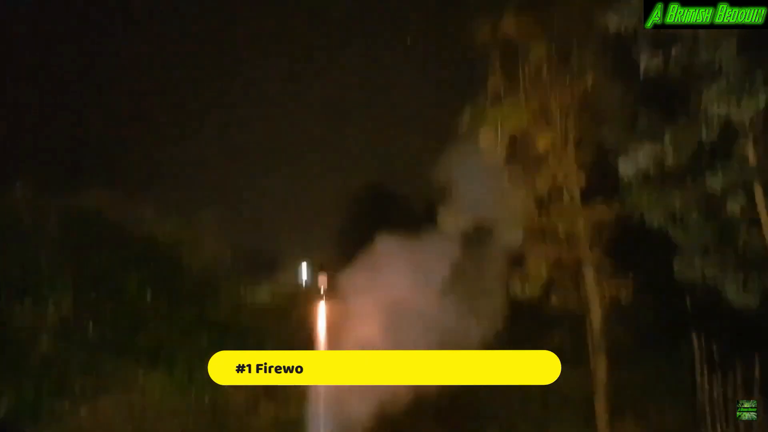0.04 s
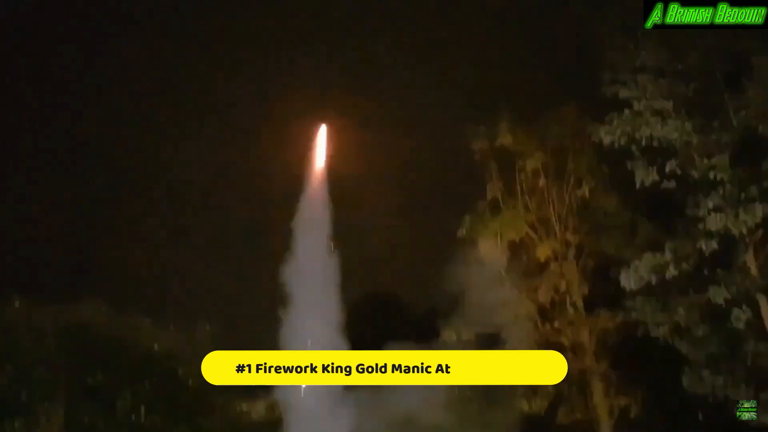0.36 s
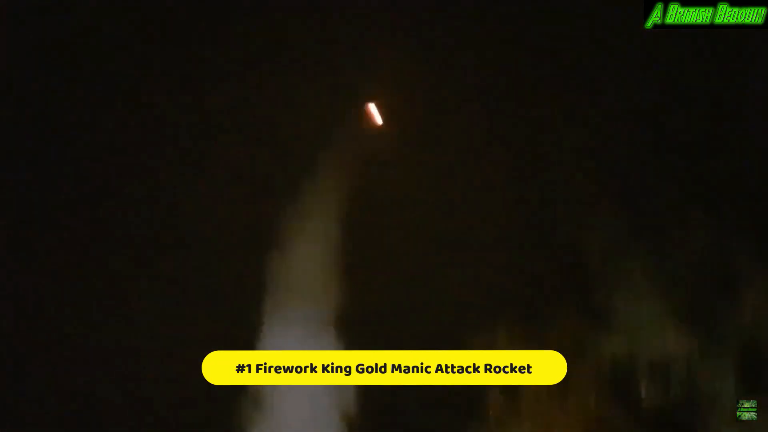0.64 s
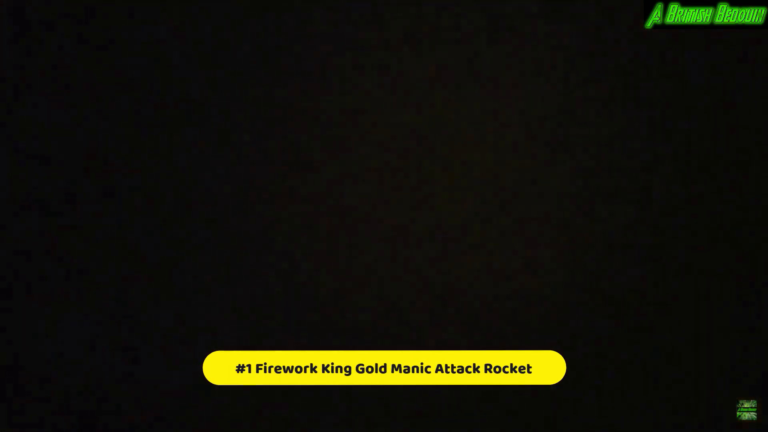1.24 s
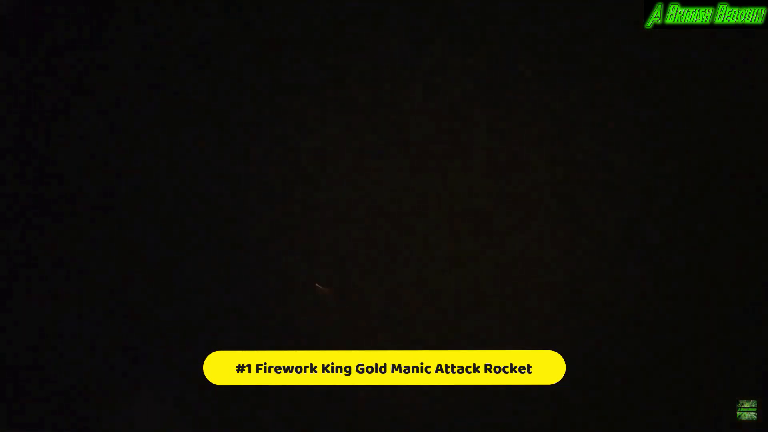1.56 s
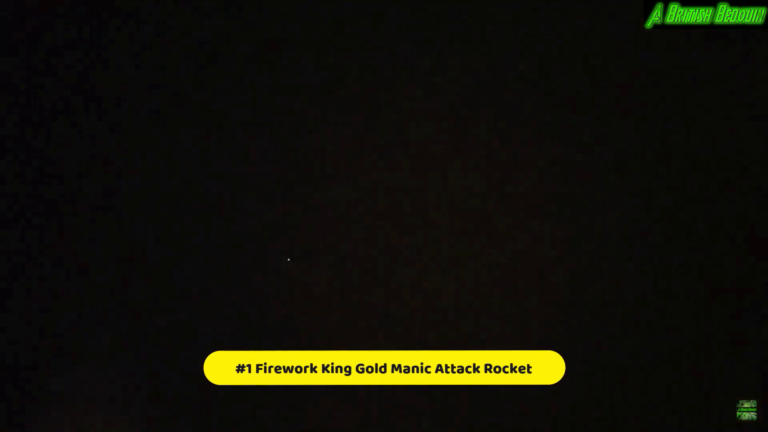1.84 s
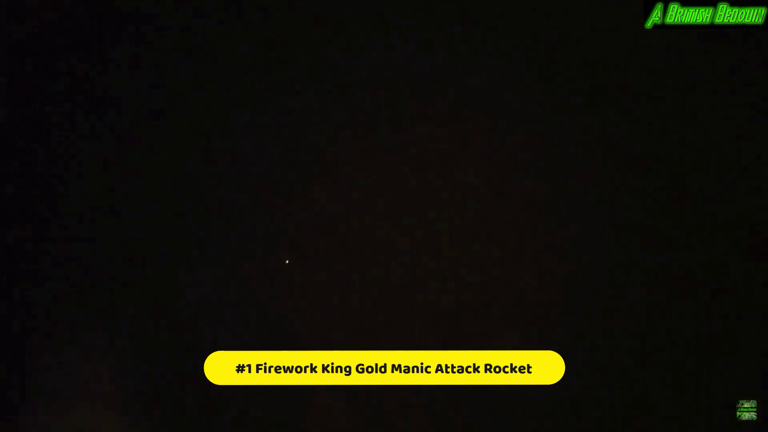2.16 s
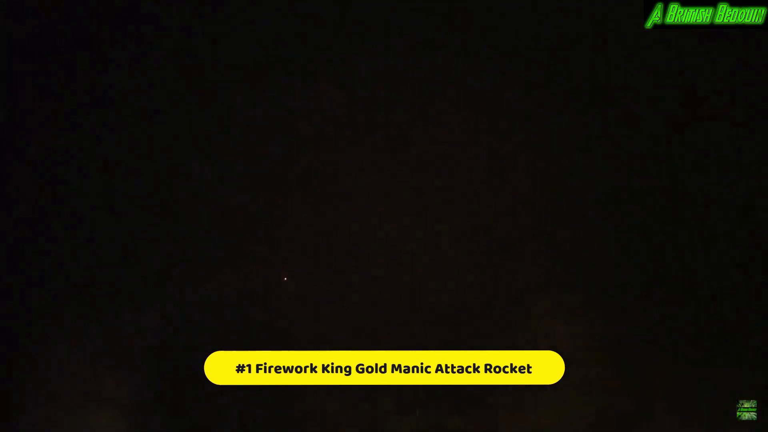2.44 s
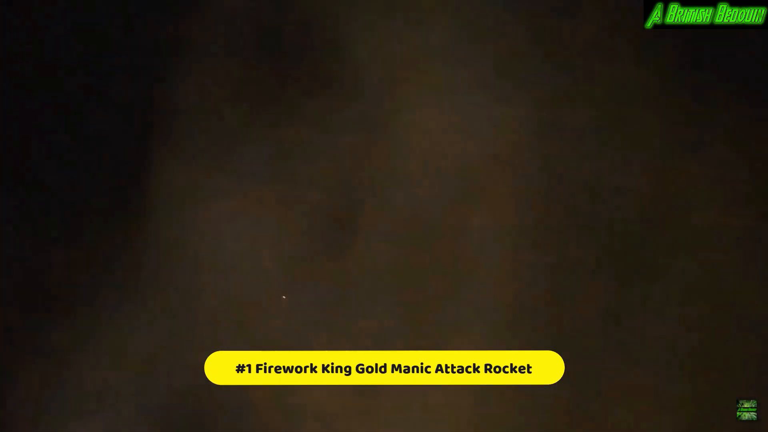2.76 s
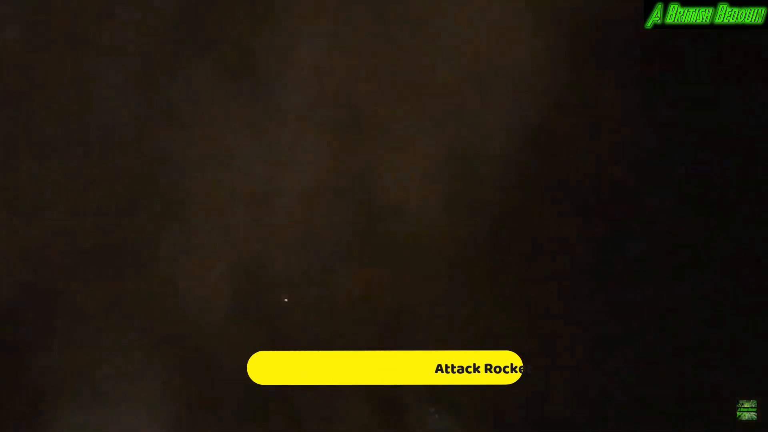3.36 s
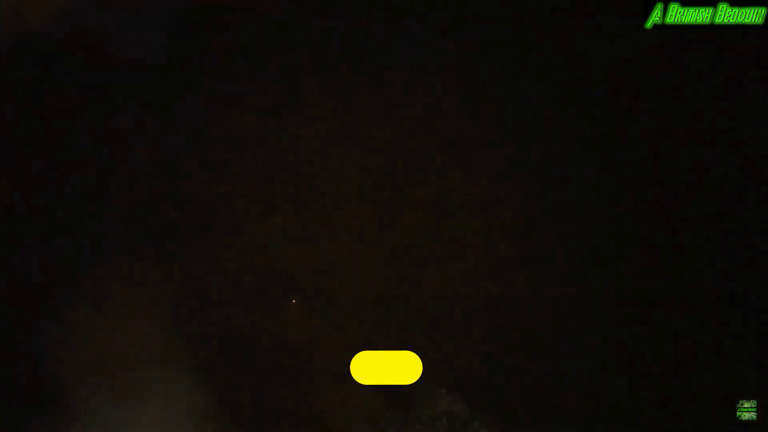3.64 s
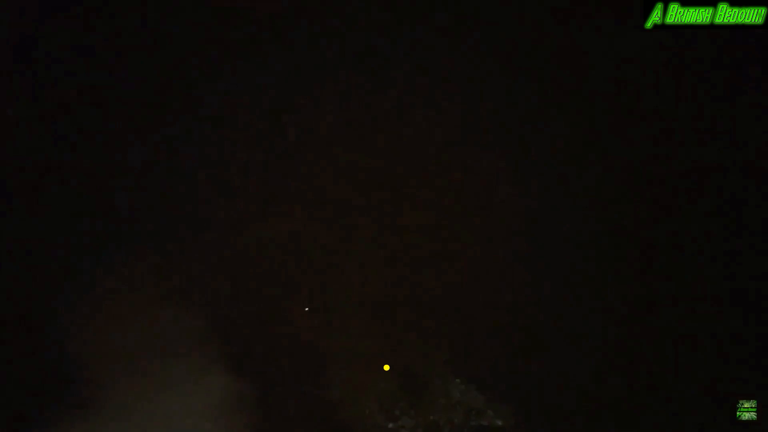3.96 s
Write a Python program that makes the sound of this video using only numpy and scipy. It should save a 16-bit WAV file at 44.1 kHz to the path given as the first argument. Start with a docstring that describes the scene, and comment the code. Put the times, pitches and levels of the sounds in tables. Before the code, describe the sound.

A firework rocket launches with a loud, sputtering hiss that darkens as it climbs and dies away. A second later it bursts overhead with a thud, quick pops and crackle, and echoes roll through the quiet night outdoors.

```python
"""A garden at night: a firework rocket roars up on a jet of rushing, sputtering gas.
Its hiss darkens as it climbs, then cuts out and dies away in the trees.
A second later it bursts overhead. Shock waves make one thud and half a second of pops,
its stars (small burning pellets) crackle as they light, and echoes roll over the country.
Soft night air lies under it all."""
import sys
import numpy as np
from scipy import signal
from scipy.fft import rfft, irfft
from scipy.io import wavfile
from scipy.ndimage import uniform_filter1d

SR = 44100
rng = np.random.default_rng(int(sys.argv[2]) if len(sys.argv) > 2 else 0)


def store_pcm(level_fs):
    """Save levels as 16-bit WAV."""
    pcm = np.round(np.clip(level_fs, -1, 1) * 32767).astype(np.int16)
    wavfile.write(sys.argv[1], SR, np.atleast_2d(pcm).T)


N = 176400
TIME = np.arange(N) / SR
GROUND_LAG_S = .0097  # delay of the ground echo for a sound overhead
TOP_HZ = 15800


def amp(db):
    """Turns decibels into a gain."""
    return 10 ** (np.asarray(db) / 20)


def unit(x):
    """Scales a sound to an average power of 1."""
    return x / np.sqrt(np.mean(x ** 2) + 1e-20)


def at_hz(points, hz):
    """Reads between the rows of a table on a log frequency scale."""
    f, values = np.transpose(points)
    return np.interp(np.log(hz + 1), np.log(f + 1), values)


def level(points):
    """Gain over time; silent before a table starting after 1 s and after one ending by 3 s."""
    t, db = np.transpose(points)
    before = -140 if t[0] > 1 else db[0]
    after = db[-1] if t[-1] > 3 else -140
    return amp(np.interp(TIME, t, db, left=before, right=after))


def colour(x, points):
    """Turns each frequency up or down as a table says."""
    gain = amp(at_hz(points, np.fft.rfftfreq(2 * N, 1 / SR)))
    return irfft(rfft(x, 2 * N) * gain)[:N]


def clicks(per_s, spread_db):
    """Random clicks, a few of them large."""
    hits = (rng.random(N) < per_s / SR) * rng.choice([-1, 1], N)
    return unit(hits * amp(spread_db * np.minimum(rng.exponential(1, N), 3)))


def echo(x, fade_times):
    """A blurred outdoor echo; each frequency drops 60 dB in its own fade time."""
    hz, t, noise = signal.stft(rng.standard_normal(N), SR, nperseg=256)
    decay = amp(-60 * t / at_hz(fade_times, hz)[:, None])
    decay /= np.sqrt((decay ** 2).sum(1, keepdims=True) * 128)
    tail = signal.istft(noise * decay, SR, nperseg=256)[1]
    return signal.fftconvolve(x, tail)[:N]


def bounce(x, lag_s, gain):
    """Adds the delayed copy that comes off the ground."""
    return (x + gain * np.interp(TIME - lag_s, TIME, x, left=0)) / np.sqrt(1 + gain ** 2)


# tone of the air: f/Hz, relative level/dB
AIR_TONE = [(25, -15), (90, -4), (220, -4.5), (550, -3.5), (900, -10), (2000, -9), (4000, -18),
            (6000, -28.5), (15000, -32)]


def night_air():
    """A soft, steady, low rush."""
    return amp(-62.5) * unit(colour(rng.standard_normal(N), AIR_TONE))


# loudness of the motor: t/s, level/dB
JET_LEVEL = [(0, -21.5), (.035, -18), (.09, -18.5), (.13, -17), (.4, -17), (.56, -17.5), (.72, -21.5),
             (.82, -22), (.92, -23.5), (.965, -28), (1.01, -43.5), (1.08, -61)]
# its tone on the ground, climbing and high up: f/Hz, relative level/dB
GROUND_TONE = [(40, -12), (200, -10.5), (500, -9.5), (950, -6.5), (1400, -7.5), (2000, -1), (3000, -3.5),
               (4200, -0.5), (5400, -8.5), (9000, -5.5), (15500, -8)]
CLIMB_TONE = [(40, -10), (90, -6.5), (170, -8.5), (500, -9), (950, -5.5), (1400, -5), (2100, -1.5),
              (2900, -6.5), (4200, -0.5), (5600, -7.5), (9000, -6), (15500, -8.5)]
HIGH_TONE = [(40, -19), (190, -18), (300, -10), (460, -8.5), (680, -7), (1000, -8), (1500, -5),
             (2100, -4.5), (2800, -9), (4000, -6.5), (5300, -12.5), (9000, -18), (11500, -18),
             (15500, -23.5)]
# blending points for those three tones: t/s
TONE_TIMES = [0.46, 0.44, 0.76]
# the roar's peak, which sinks as the nozzle turns towards the listener: t/s, f/Hz, boost/dB
ROAR_PEAK = [(0, 2020, 1.5), (.14, 3000, 3), (0.241, 2890, 5.5), (0.319, 2500, 7), (.42, 1850, -4.5),
             (.52, 999, 0.5), (.6, 656, 6.5), (0.742, 1080, 2.5), (0.901, 1337, 3.5)]


def jet():
    """Swirling, sputtering exhaust gas that sounds darker as the rocket climbs."""
    gas = rng.standard_normal(N) + amp(-10) * clicks(per_s=2500, spread_db=3.5)
    climb = 0.099 + .9 * np.tanh((TIME / .7) ** 2)
    gas = bounce(gas, GROUND_LAG_S * climb, gain=0.18)  # higher rocket, later echo
    hz, t, bands = signal.stft(gas, SR, nperseg=512, noverlap=384)
    db = sum(np.outer(at_hz(tone, hz), np.interp(t, TONE_TIMES, share))
             for tone, share in zip((GROUND_TONE, CLIMB_TONE, HIGH_TONE), np.eye(3)))
    peak_s, peak_hz, boost_db = np.transpose(ROAR_PEAK)
    octaves_away = np.log2((hz[:, None] + 1) / np.interp(t, peak_s, peak_hz))
    db += np.interp(t, peak_s, boost_db) * np.exp(-.5 * (octaves_away / .14) ** 2)
    patches = uniform_filter1d(rng.standard_normal(bands.shape), size=4, axis=0)
    db += 2 * unit(uniform_filter1d(patches, size=20, axis=1))  # the tone flickers
    gain = amp(db) / np.sqrt((amp(db)[hz < TOP_HZ] ** 2).sum(0) / len(hz))  # evens out the power
    flutter_db = 0.41 * unit(uniform_filter1d(rng.standard_normal(len(t)), size=3))
    roar = signal.istft(bands * gain * amp(flutter_db), SR, nperseg=512, noverlap=384)[1][:N]
    return roar / np.std(gas) * level(JET_LEVEL)


# tone of the trees' echo: f/Hz, level/dB
TREE_TONE = [(60, -30.5), (160, -21.5), (260, -11.5), (400, -17.5), (520, -15.5), (1000, -21), (2000, -18),
             (4000, -17), (8000, -15), (15000, -18.5)]
# how long it rings: f/Hz, fade time/s
TREE_FADE = [(100, 1.3), (500, 2.1), (2000, 2), (4000, 1.74), (8000, 1.2), (15000, 0.95)]


def tree_echo(rocket):
    """The trees throw the jet's roar back."""
    return colour(echo(rocket, TREE_FADE), TREE_TONE)


# shock waves: t/s, level before filtering/dB, length/ms, treble limit f/Hz, relative echo level/dB
SHOCKS = [(1.721, -50, 5.1, 410, -1), (1.811, -44, 3.3, 550, -3), (1.895, -49.5, 2.2, 900, 12.5),
          (2.042, -11.5, 3.3, 380, -0.5), (2.083, -34, 0.93, 2400, -11), (2.112, -17.5, 4.8, 420, -16),
          (2.168, -19, 4.38, 1100, -2), (2.191, -26, 2.7, 700, -16), (2.232, -44, 3.2, 600, 6),
          (2.242, -25.5, 1.5, 3200, -1), (2.284, -29, 1.7, 1300, -24), (2.349, -18, 3, 1780, -22),
          (2.356, -27.5, 1.03, 2200, 13.5), (2.365, -27, 1.27, 2480, -19), (2.453, -23, 2.7, 900, 4),
          (2.479, -23, 2.7, 2300, -11), (2.508, -30.5, 0.87, 1200, 12), (2.552, -23.5, 1.18, 5250, 2),
          (2.568, -21, 0.88, 1700, 5), (2.739, -44, 4.5, 700, 9), (2.936, -32.5, 2.7, 520, 2),
          (3.139, -37, 2.87, 1700, 3), (3.328, -42, 3.7, 691, -7.5), (3.508, -51, 1.9, 1200, 15),
          (3.521, -40, 1.2, 1500, 5), (3.536, -49, 2.4, 1700, 8)]
# how long their echoes ring: f/Hz, fade time/s
SCATTER_FADE = [(100, 0.12), (1000, 0.091), (8000, 0.14)]


def bangs():
    """Shock waves, rounded by the air, bounce off the ground and scatter off different trees in turn."""
    direct, trees = np.zeros(N), np.zeros((3, N))
    for k, (start, db, length_ms, treble_hz, echo_db) in enumerate(SHOCKS):
        progress = (TIME - start) * 1000 / length_ms
        # the pressure draws an N: jump up, slide down, jump back
        shock = amp(db) * (1 - 2 * progress) * (progress >= 0) * (progress < 1) + 1e-18
        rounded = signal.lfilter(*signal.butter(2, treble_hz, fs=SR), shock)
        wave = rounded + amp(-24.5) * shock  # a little stays sharp
        direct += wave
        trees[k % len(trees)] += amp(echo_db) * wave
    sound = bounce(direct, GROUND_LAG_S, gain=0.68) + sum(echo(x, SCATTER_FADE) for x in trees)
    return signal.lfilter(*signal.butter(2, 110, "high", fs=SR), sound)


# loudness of the hiss: t/s, level/dB
HISS_LEVEL = [(2.04, -100), (2.1, -70.5), (2.8, -72), (3.4, -78), (4, -86)]


def hiss():
    """A faint, bright hiss lingers after the burst."""
    return level(HISS_LEVEL) * rng.standard_normal(N)


# loudness of the rolling echoes: t/s, level/dB
ROLL_LEVEL = [(2.045, -70), (2.07, -33.5), (2.2, -29.5), (2.38, -31.5), (2.45, -37), (2.58, -38.5),
              (2.7, -47.5), (2.85, -50.5), (3.1, -52), (3.4, -51), (3.7, -55), (4, -61)]
# their tone: f/Hz, relative level/dB
ROLL_TONE = [(25, -46), (55, -17), (85, -6.5), (140, -5), (210, -0.5), (330, -2.5), (500, -18.5),
             (750, -15.5), (1200, -25.5), (3000, -36.5), (15000, -61)]


def rolling_echoes():
    """Countless dull echoes of the burst come back from the land."""
    thuds = bounce(clicks(per_s=820, spread_db=0.5), GROUND_LAG_S, gain=0.14)
    return unit(colour(thuds, ROLL_TONE)) * level(ROLL_LEVEL)


# loudness of the crackle: t/s, level/dB
CRACKLE_LEVEL = [(2.068, -62), (2.087, -40.5), (2.125, -50), (2.175, -39), (2.25, -46), (2.32, -52),
                 (2.365, -39.5), (2.44, -59), (2.49, -45), (2.54, -52.5), (2.56, -50), (2.61, -67),
                 (2.7, -82)]
# tone of the crackle and of its echo: f/Hz, relative level/dB
CRACKLE_TONE = [(200, 2), (700, 4.5), (1400, -4.5), (2200, -2), (3200, -6.5), (4300, -8.5), (6000, -19.5),
                (9000, -23.5), (15000, -32)]
CRACKLE_ECHO_TONE = [(500, -4.5), (2000, -0.5), (4000, -2.5), (7000, -17), (15000, -15)]
# how long that echo rings: f/Hz, fade time/s
CRACKLE_FADE = [(500, 6.2), (2000, 2.9), (3000, 1.6), (4200, 3.2), (7000, 3.5), (15000, 0.83)]


def crackling_stars():
    """The stars catch fire with many tiny cracks, which leave a long echo."""
    sizzle = clicks(per_s=4300, spread_db=6.0) + 0.84 * rng.standard_normal(N)
    cracks = unit(colour(sizzle, CRACKLE_TONE)) * level(CRACKLE_LEVEL)
    return cracks + colour(echo(cracks, CRACKLE_FADE), CRACKLE_ECHO_TONE)


# short whizzes: t/s, length/s, start f/Hz, end f/Hz, level/dB
WHIZZ_GLIDES = [(2.138, 0.027, 5000, 5500, -46.5), (2.156, 0.015, 4460, 3720, -39),
                (3.926, 0.056, 4000, 5180, -76), (3.928, 0.057, 6000, 7900, -80.5)]


def whizzes(width_hz=650):
    """Thin hisses that slide in pitch, like flying sparks."""
    out = np.zeros(N)
    for start, length, from_hz, to_hz, db in WHIZZ_GLIDES:
        progress = np.clip((TIME - start) / length, 0, 1)
        swell = 2 * np.sqrt(2 * progress * (1 - progress))
        noise = rng.standard_normal(N) + 1j * rng.standard_normal(N)
        fuzz = unit(signal.lfilter(*signal.butter(2, width_hz / 2, fs=SR), noise).real)
        hz = from_hz + (to_hz - from_hz) * progress
        out += amp(db) * swell * fuzz * np.cos(2 * np.pi * np.cumsum(hz) / SR)
    return out


def scene():
    """Launch, burst and night air, the same in both channels."""
    rocket = jet()
    mono = night_air() + hiss() + rocket + tree_echo(rocket)
    mono += bangs() + rolling_echoes() + crackling_stars() + whizzes()
    return np.array([mono, mono])


def record(dry):
    """Cuts the treble above TOP_HZ."""
    lowpass = signal.firwin(511, TOP_HZ, window=("kaiser", 9), fs=SR)
    return signal.oaconvolve(dry, lowpass[None], "same")


dry = scene()
out = record(dry)
store_pcm(out)
```